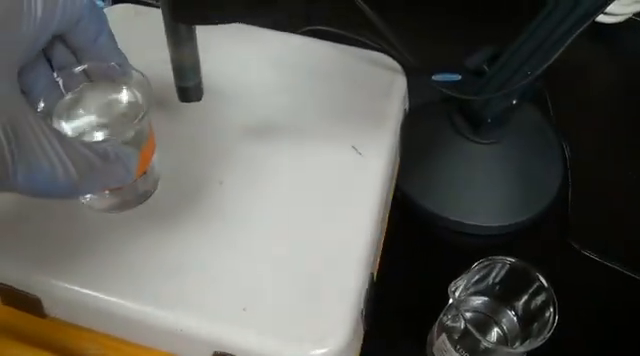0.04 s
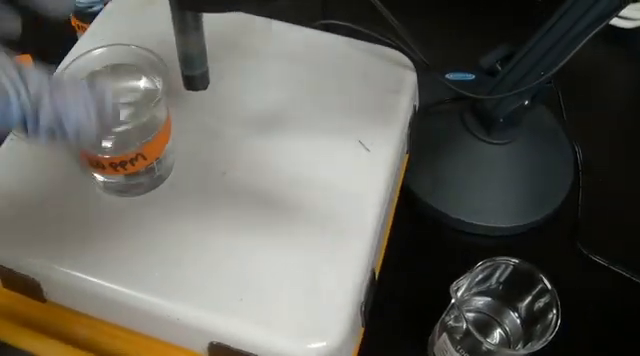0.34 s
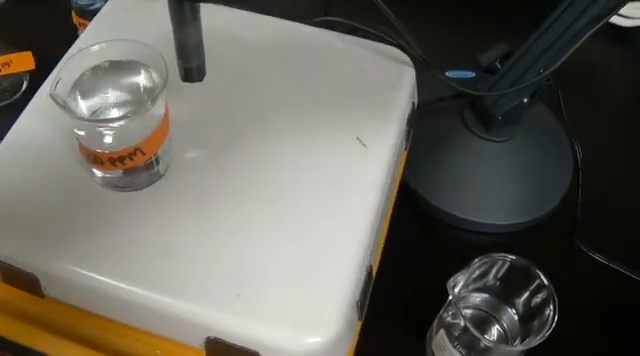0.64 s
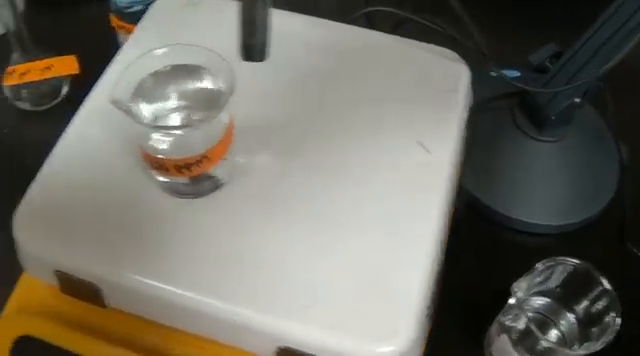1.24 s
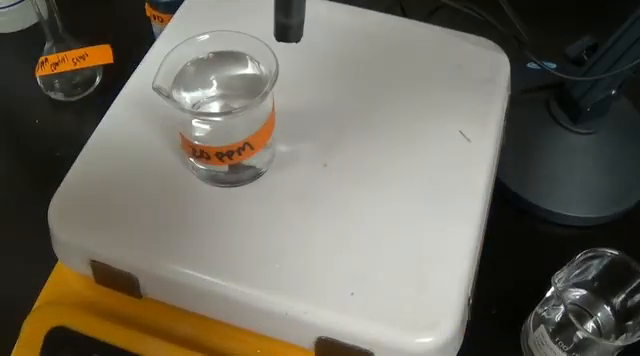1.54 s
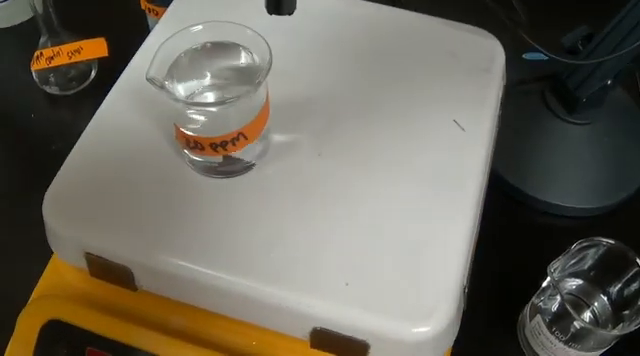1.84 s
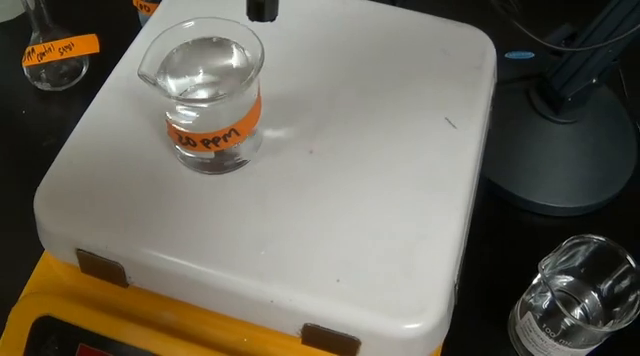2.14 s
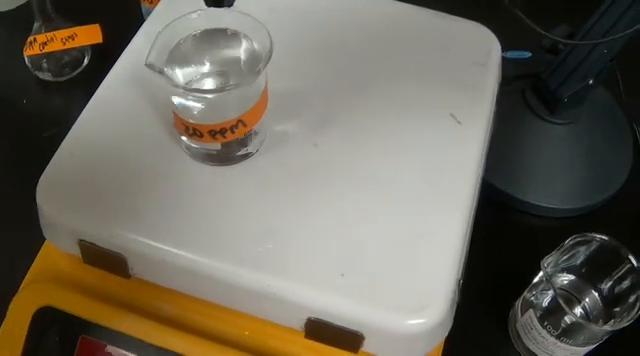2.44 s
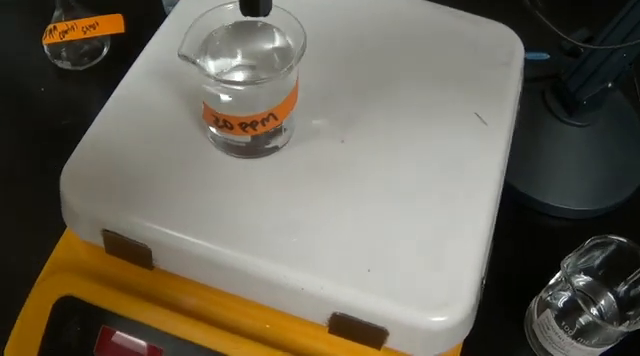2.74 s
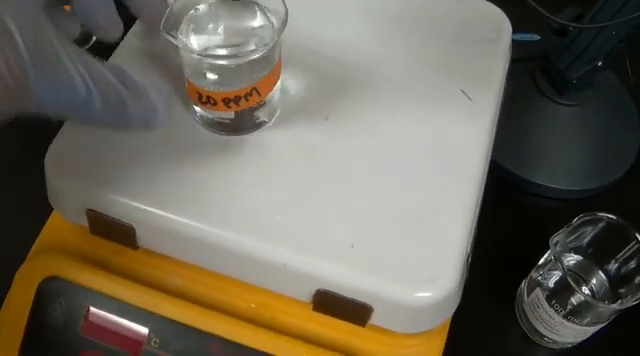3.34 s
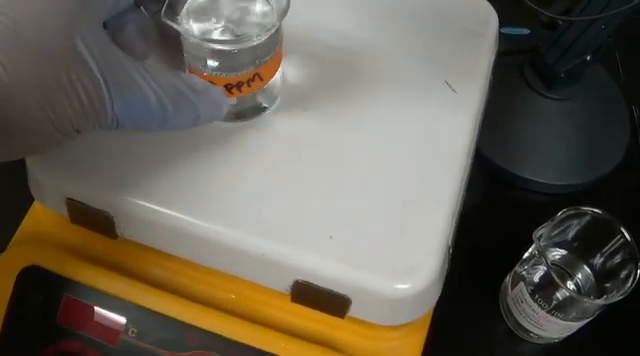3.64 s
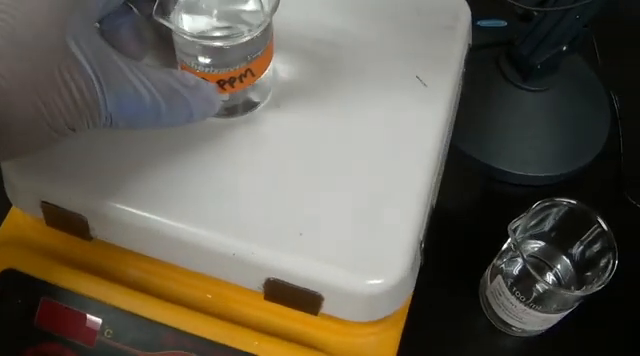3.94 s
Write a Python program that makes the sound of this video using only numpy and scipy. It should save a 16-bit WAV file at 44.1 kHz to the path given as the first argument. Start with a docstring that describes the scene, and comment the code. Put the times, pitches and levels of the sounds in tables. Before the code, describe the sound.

Close to the microphone, an off-centre stir bar keeps clattering against a glass beaker on a stirrer, bouncing and ticking in a quick rhythm. A faint hiss passes, then one soft bench bump, over low lab ventilation.

```python
"""A small lab with quiet ventilation, a stereo pair close to a hotplate stirrer on the bench.
A magnetic stir bar, off centre, rattles in a small glass beaker of water. About six times a second it
knocks and bounces against the glass: the plate clacks, the beaker ticks and rings, the housing shakes.
A faint hiss swells once, and one dull bump on the bench sounds a little past midway."""
import sys
import numpy as np
from scipy import signal
from scipy.fft import rfft, irfft
from scipy.io import wavfile

SR = 44100
rng = np.random.default_rng(int(sys.argv[2]) if len(sys.argv) > 2 else 0)


def generate_wav(sig):
    """Save sig (samples, or channels by samples) to the path in sys.argv[1] as 16-bit PCM at SR."""
    pcm = np.round(np.clip(np.atleast_2d(sig).T, -1, 1) * 32767).astype(np.int16)
    wavfile.write(sys.argv[1], SR, pcm)


N = 176400
RING_TIME = np.arange(SR // 3) / SR  # seconds since a hit

# Knocks of the bar. Each row: start in seconds, level in dB.
BAR_KNOCKS = [(0.0174, -13.5), (0.0628, -16.5), (0.0888, -25), (0.102, -27), (0.1763, -30), (0.2299, -16.5),
              (0.2417, -18.5), (0.2654, -26), (0.2862, -28.5), (0.3255, -20.5), (0.341, -21),
              (0.3482, -18.5), (0.3872, -24), (0.3967, -19.5), (0.428, -30.5), (0.448, -34), (0.4998, -19),
              (0.5076, -20), (0.5456, -17.5), (0.6681, -18.5), (0.719, -15), (0.7518, -31), (0.8168, -23),
              (0.8316, -16), (0.873, -22.5), (0.976, -20), (0.991, -18), (1.0392, -19.5), (1.0808, -28),
              (1.1342, -21), (1.148, -15.5), (1.1909, -19), (1.229, -36), (1.2898, -19.5), (1.3044, -15.5),
              (1.3108, -21), (1.349, -22), (1.4447, -19.5), (1.459, -15.5), (1.467, -19.5), (1.4998, -17.5),
              (1.6, -19), (1.6123, -17), (1.6578, -18), (1.7616, -21), (1.8009, -18.5), (1.8374, -26),
              (1.9251, -12.5), (1.975, -13.5), (2.0766, -16), (2.118, -16), (2.1523, -22.5), (2.2364, -21),
              (2.24, -14.5), (2.255, -19.5), (2.2854, -17), (2.2958, -18), (2.3137, -19.5), (2.3938, -15.5),
              (2.408, -23.5), (2.4363, -16), (2.554, -17.5), (2.56, -18.5), (2.602, -13), (2.6248, -18),
              (2.7088, -19), (2.7192, -18), (2.7463, -17), (2.7774, -25.5), (2.8655, -13.5),
              (2.8801, -24.5), (2.9106, -19), (3.0206, -15), (3.061, -22), (3.0703, -17.5), (3.171, -24.5),
              (3.1759, -16), (3.193, -21), (3.2175, -12.5), (3.3256, -20), (3.3379, -16), (3.3668, -19),
              (3.397, -33), (3.432, -24.5), (3.4793, -18), (3.5272, -18), (3.548, -25), (3.6402, -16),
              (3.649, -20), (3.6627, -16.5), (3.6842, -16.5), (3.8101, -18.5), (3.8314, -17), (3.8527, -20),
              (3.9467, -18), (3.96, -16.5), (3.9751, -18)]
# Colour of the bright noise in ticks and hiss. Each row: frequency in Hz, relative level in dB.
BRIGHT_NOISE = [(3200, -15.5), (5500, 7), (9000, -4.5), (11400, -12), (14000, -42)]


def stir_bar(bounces=6, mean_gap_s=0.0055):
    """Each knock shakes the housing, rings the rim and bounces; hard strikes add a bright tick."""
    # The stirrer's housing. Each row: frequency in Hz, t60 in seconds, level in dB re the knock.
    housing_modes = [(114, 0.099, -37), (156.8, 0.32, -30), (334.5, 0.1, -13.5), (406.3, 0.073, -20)]
    # Lasting ring of the beaker's rim. Each row: frequency in Hz, t60 in seconds, relative level in dB.
    rim_modes = [(2652, .13, -13.5), (2709, .19, -16), (2838, .13, -19.5)]
    # Hard strikes on the glass wall. Each row: start in seconds, level in dB.
    hard_strikes = [(0.0173, -26.5), (0.507, -25.5), (0.6622, -30.5), (1.46, -21), (2.1177, -30),
                    (2.2359, -20), (2.5494, -20), (2.602, -25), (2.7085, -21), (3.637, -25), (2.871, -24.5),
                    (3.0209, -19.5), (3.1715, -23.5), (3.327, -23.5), (3.8327, -22), (3.976, -24.5)]
    out = np.zeros(N)
    for at, db in BAR_KNOCKS:
        add(out, at, undb(db) * knock(at))
        add(out, at, undb(db) * ring(housing_modes, RING_TIME))
        rim_db = db - 2.5 + 2 * at  # the rim rings more freely as the rattle goes on
        add(out, at, undb(rim_db) * ring(rim_modes, RING_TIME, detune=0))
        for k in range(bounces):
            at += mean_gap_s * rng.uniform(0.5, 1.5)
            bounce_db = db - 10 - 3 * k + rng.uniform(-8.5, 8.5)  # weakening, but unevenly
            add(out, at, undb(bounce_db) * knock(at))
    for at, db in hard_strikes:
        add(out, at, undb(db) * glass_tick(at))
    return out


def knock(at):
    """The bar hits: beaker and plate clack together, with more or less of the glass tick."""
    # Beaker and plate together. Each row: frequency in Hz, t60 in seconds, relative level in dB.
    clack_modes = [(758, 0.043, -21), (1180, 0.013, -5.5), (1318, 0.016, 4), (1525, 0.026, -3),
                   (2316.6, 0.022, 0.5), (2616, 0.018, -10.5), (3081, 0.037, -10), (3698, 0.021, -14),
                   (4124, 0.023, -16)]
    # Colour of the contact noise. Each row: frequency in Hz, relative level in dB.
    clack_noise = [(200, -37.5), (400, -10.5), (850, -7.5), (1300, -1.5), (1850, -4.5), (2500, -0.5),
                   (4200, -12.5), (6000, -45)]
    clack = contact(clack_modes, clack_noise, noise_db=-5, rise_s=0.0014, noise_fade_s=0.0027)
    tick_db = -20.5 + 0.53 * at + rng.uniform(0, 12)  # contacts slowly harden; some are harder by chance
    return clack + undb(tick_db) * glass_tick(at)


def glass_tick(at, sparkle_above_hz=9000):
    """A hard contact rings the glass; its highest modes come out as the contacts harden with time."""
    # Stiff modes of the glass. Each row: frequency in Hz, t60 in seconds, relative level in dB.
    glass_modes = [(5544, 0.0079, 3.5), (7000, 0.03, -16.5), (10287, 0.021, 0), (11425, 0.015, 5)]
    sparkle_db = -8 + 3 * at
    modes = [(hz, t60, db + sparkle_db * (hz > sparkle_above_hz)) for hz, t60, db in glass_modes]
    return contact(modes, BRIGHT_NOISE, noise_db=-6.5, rise_s=0.00018, noise_fade_s=0.0052)


def contact(modes, noise_curve, noise_db, rise_s, noise_fade_s):
    """One contact: ringing modes and a short crack of noise swell quickly and die away."""
    t = RING_TIME[:2048]
    crack = colour(rng.standard_normal(len(t)), noise_curve) * np.exp(-t / noise_fade_s)
    body = unit_attack(ring(modes, t)) + undb(noise_db) * unit_attack(crack)
    return unit_attack(body * onset(t, rise_s))


def ring(modes, t, detune=0.012, scatter_db=4.5):
    """Fading sines of chance strength, phase and tuning: each contact point sounds a little different."""
    hz, t60, db = np.array(modes, float).T[:, :, None]
    strength, shift = rng.standard_normal((2, len(hz), 1))
    cycles = hz * (1 + detune * shift) * t + rng.random((len(hz), 1))
    gain = undb(db + scatter_db * np.tanh(strength))
    return np.sum(gain * decay(t, t60) * np.sin(2 * np.pi * cycles), 0)


def grazes(pause_s=0.07, level_db=-35.5):
    """After a pause the bar taps the glass softly just before it hits."""
    out, previous = np.zeros(N), 0
    for at, _ in BAR_KNOCKS:
        if at - previous > pause_s:
            lead_s = rng.uniform(0.018, 0.022)
            add(out, at - lead_s, undb(level_db) * knock(at))
        previous = at
    return out


def bench_bump(at=2.3762):
    """A soft, heavy blow on the bench that rings only low modes."""
    # Modes of the bump. Each row: frequency in Hz, t60 in seconds, level in dB.
    bump_modes = [(115, .15, -21), (160, .2, -23), (330, .07, -9), (425, .04, -7), (505, .2, -27)]
    out, t = np.zeros(N), RING_TIME
    thud = sum(undb(db) * decay(t, t60) * np.sin(2 * np.pi * hz * t) for hz, t60, db in bump_modes)
    add(out, at, -thud * onset(t, rise_s=0.00086))
    return out


def hiss(peak_s=1.26, width_s=0.14, level_db=-51):
    """A faint, bright hiss that comes and goes once."""
    noise = colour(rng.standard_normal(N), BRIGHT_NOISE)
    swell = np.exp(-((np.arange(N) / SR - peak_s) / width_s) ** 2)
    return undb(level_db) * noise / noise.std() * swell


def ventilation(level_db=-49, width=0.33):
    """A steady rush of air behind everything."""
    # Colour of the air noise. Each row: frequency in Hz, relative spectral density in dB.
    air_curve = [(30, 3.5), (110, 1.5), (250, -12), (600, 1), (2500, -3), (4500, -15), (11500, -14.5),
                 (14000, -19)]
    noise = colour(rng.standard_normal((2, N)), air_curve)
    mid, side = noise / noise.std() * undb(level_db)
    return spread(mid, width * side)


def room_response(width=0.26):
    """The lab's short reverberation: overlapping noise bands, each dying at its own rate."""
    # Bands of the reverberation. Each row: frequency in Hz, t60 in seconds, relative level in dB.
    room_bands = [(209, 0.27, 2), (1210, 0.13, -12), (4000, 0.088, -12), (11000, 0.23, -19.5)]
    out, t = 0, RING_TIME
    log_centres = np.log([hz for hz, _, _ in room_bands])
    spectrum = rfft(rng.standard_normal((2, len(t))))
    for share, (_, t60, db) in zip(np.eye(len(room_bands)), room_bands):
        band = irfft(spectrum * np.interp(log_frequencies(len(t)), log_centres, share), len(t))
        envelope = decay(t, t60) * onset(t, rise_s=0.0019)
        out = out + undb(db) * band * envelope / np.linalg.norm(envelope)
    return spread(out[0], width * out[1])


def at_microphones(x, room, wet_db, width=0.19):
    """Direct sound, slightly out of phase at the two microphones, plus the room."""
    direct = spread(x, width * signal.hilbert(x).imag)
    reverb = signal.fftconvolve(x[None], room, axes=1)[:, :N]
    return direct + undb(wet_db) * reverb


def undb(db):
    """Amplitude from decibels."""
    return 10 ** (np.asarray(db) / 20)


def decay(t, t60):
    """A fade that loses 60 dB in t60 seconds."""
    return np.exp(-np.log(1000) * t / t60)


def onset(t, rise_s):
    """A smooth rise from 0 to 1."""
    return 1 - np.exp(-(t / rise_s) ** 2)


def log_frequencies(size):
    """Log frequency of each FFT bin."""
    return np.log(np.maximum(np.fft.rfftfreq(size, 1 / SR), 1))


def colour(x, curve):
    """Filter by a curve of (Hz, dB) points."""
    hz, db = np.array(curve, float).T
    size = x.shape[-1]
    gain = undb(np.interp(log_frequencies(size), np.log(hz), db))
    return irfft(rfft(x) * gain, size)


def unit_attack(x, attack_samples=200):
    """Scale a hit so that its attack has rms 1."""
    return x / np.sqrt(np.mean(x[:attack_samples] ** 2))


def add(out, at, x):
    """Mix x into out at a time in seconds."""
    i = int(at * SR)
    if 0 <= i < len(out):
        out[i:i + len(x)] += x[:len(out) - i]


def spread(mid, side):
    """Left and right from mid and side."""
    return np.array([mid + side, mid - side])


def scene():
    """Rattle, hiss and bump share the room, over the ventilation."""
    room = room_response()
    rattle_and_hiss = at_microphones(stir_bar() + grazes() + hiss(), room, wet_db=0.5)
    bump = at_microphones(bench_bump(), room, wet_db=-4)
    return rattle_and_hiss + bump + ventilation()


def record(dry):
    """The recorder thins the deep bass, rounds the peaks and cuts the top."""
    low_cut_hz, ceiling, top_hz = 73, 0.48, 15900
    thinned = signal.sosfilt(signal.butter(2, low_cut_hz, "high", fs=SR, output="sos"), dry)
    rounded = ceiling * np.tanh(thinned / ceiling)
    return signal.sosfilt(signal.ellip(8, 0.2, 80, top_hz, fs=SR, output="sos"), rounded)


dry = scene()
out = record(dry)
generate_wav(out)
```